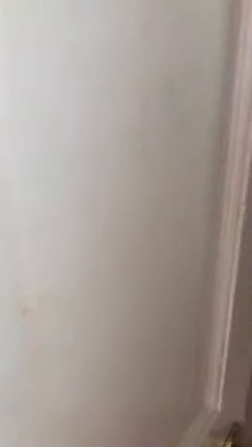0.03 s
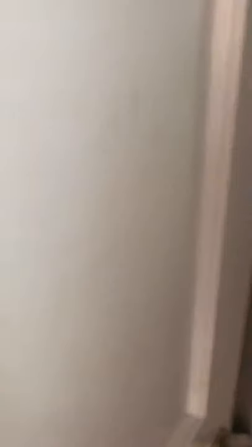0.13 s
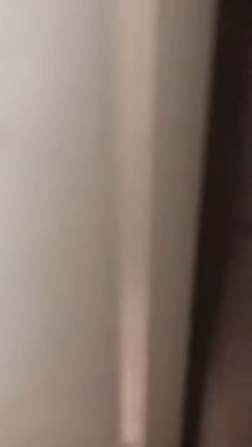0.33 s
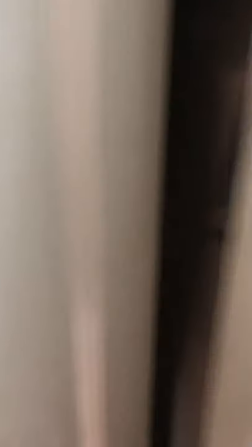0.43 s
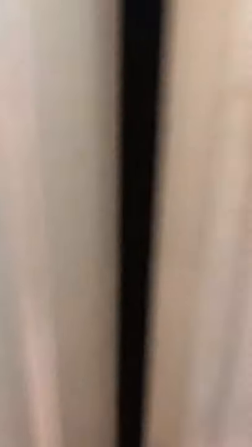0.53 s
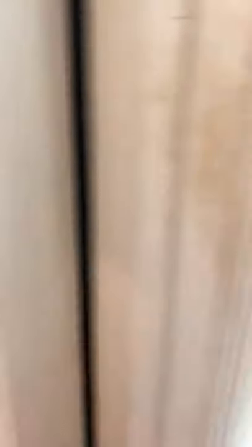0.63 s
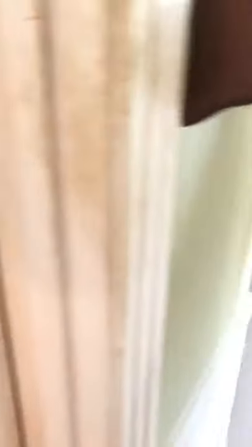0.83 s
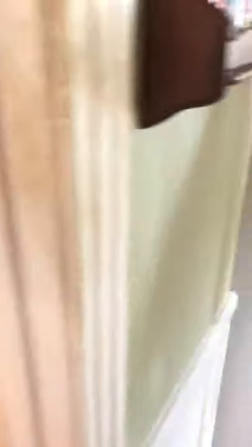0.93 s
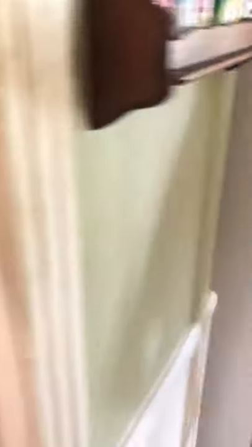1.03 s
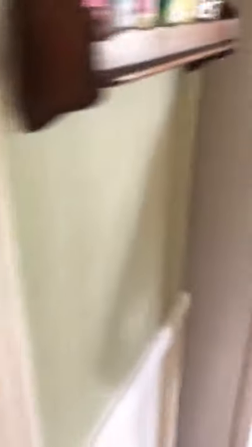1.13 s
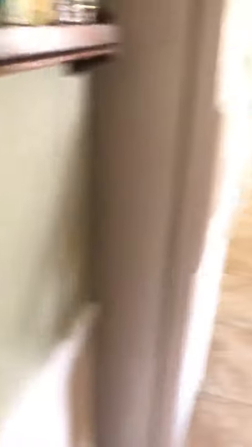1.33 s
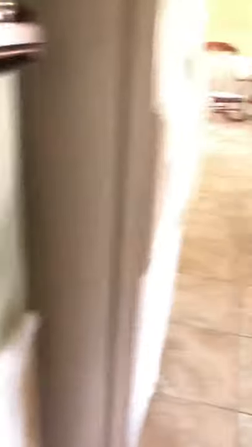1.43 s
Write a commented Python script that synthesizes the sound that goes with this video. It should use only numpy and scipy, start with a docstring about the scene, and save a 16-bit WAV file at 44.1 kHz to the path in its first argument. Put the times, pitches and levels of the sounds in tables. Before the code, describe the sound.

A door hinge squeaks indoors over a steady, quiet low hum. Faint handling rustle and ticks lead to a juddering bolt scrape at 0.2-0.3 s. From 0.37 s a thin, unsteady squeak falls in glides and steps, dropping to a short lower note near 0.8 s. At 0.87 s the latch clacks sharply with a woody boom; brushing follows around 1.15 s, with light clicks at 1.2 and 1.43 s.

```python
"""In a quiet, humming house a pantry door is worked open. The latch bolt scrapes and judders back in short slips of
filtered noise. A dry hinge sings a falling stick-slip squeak, a sum of unsteady harmonics, and drops to a lower note.
Then the latch clacks, as noise cracks with ringing metal modes, and sets the wooden panel booming in its own modes.
Something brushes along the door and the hardware ticks a few more times, as band-limited noise bursts."""
import sys
import numpy as np
from scipy import signal
from scipy.fft import rfft, irfft
from scipy.io import wavfile
from scipy.ndimage import uniform_filter1d

SR = 44100
rng = np.random.default_rng(int(sys.argv[2]) if len(sys.argv) > 2 else 0)


def pcm_store(signal):
    """Save signal as 16-bit PCM."""
    levels = np.round(np.clip(np.atleast_2d(signal), -1, 1) * 32767)
    wavfile.write(sys.argv[1], SR, levels.astype(np.int16).T)


N = 66150
T = np.arange(N) / SR  # time in seconds


def from_db(db):
    """Logarithmic level: decibels become an amplitude gain."""
    return 10 ** (np.asarray(db) / 20)


def rms_one(x):
    """Effective value: scale a signal to unit rms."""
    return x / np.sqrt(np.mean(x ** 2) + 1e-20)


def in_time(rows):
    """Linear interpolation: join the rows of a curve by straight lines, one signal per column after the time."""
    seconds, *columns = np.transpose(rows)
    return [np.interp(T, np.sort(seconds), column) for column in columns]


def during(rows):
    """Gating: one while a curve lasts, zero outside, with edges smoothed over 200 samples."""
    inside = (T > rows[0][0]) & (T < rows[-1][0])
    return uniform_filter1d(1. * inside, size=200)


def filtered(x, hz, kind, order=2):
    """Linear filtering: a Butterworth response, maximally flat in its passband."""
    edges_hz = np.clip(hz, 10, .45 * SR)
    sections = signal.butter(order, edges_hz, kind, fs=SR, output="sos")
    return signal.sosfilt(sections, x + 1e-18)


def drift(rate_hz):
    """Random modulation: low-passed noise of unit rms, taken after the filter has settled."""
    wander = filtered(rng.standard_normal(2 * N), rate_hz, "low")
    return rms_one(wander[N:])


def noise(colour):
    """Spectral shaping: white noise weighted along a curve over log frequency, at unit rms."""
    hz, db = np.transpose(colour)
    bins_hz = np.maximum(np.fft.rfftfreq(N, 1 / SR), 1)
    weight = from_db(np.interp(np.log(bins_hz), np.log(hz), db))
    return rms_one(irfft(rfft(rng.standard_normal(N)) * weight, N))


def dying(start, t60):
    """Exponential decay: instant attack, then a fall of 60 dB in t60 seconds."""
    return (T >= start) * from_db(-60 * np.maximum(T - start, 0) / t60)


def swell(start, rise_s):
    """Exponential build-up: from zero towards one with the time constant rise_s."""
    return 1 - np.exp(-np.maximum(T - start, 0) / rise_s)


def ring(start, modes, spread_db):
    """Modal superposition: decaying sines, each with a slightly different strength at every blow."""
    out, first = np.zeros(N), round(start * SR)
    for k, (hz, db, t60) in enumerate(modes):
        t = T[:min(round(2 * t60 * SR), N - first)]
        level_db = db + spread_db * rng.standard_normal() - 60 * t / t60
        sign = (-1) ** k  # neighbouring modes start in opposite directions
        out[first:first + len(t)] += sign * from_db(level_db) * np.sin(2 * np.pi * hz * t)
    return out


# Steady hum of the house. Each row: frequency in Hz, mean level in dB rms.
HUM = [(59.5, -67.5), (119.7, -63.5), (165, -62), (187.8, -54.5), (358, -69.5)]
# Spectrum of the still air. Each row: frequency in Hz, relative density in dB per Hz.
AIR_COLOUR = [(20, -15), (45, -3.5), (90, -1), (180, 3.5), (260, -3), (390, -6), (520, -12.5), (800, -14.5),
              (1500, -17.5), (3800, -29), (5800, -35.5), (8000, -31.5), (16000, -47)]
AIR_DB = -56  # rms
HUM_WAVER_DB, HUM_WAVER_HZ = 1.6, 8


def house():
    """Superposition of tones and noise: wavering hum lines lie over still air."""
    hum = 0
    for hz, db in HUM:
        strength = from_db(db + HUM_WAVER_DB * drift(HUM_WAVER_HZ))
        hum = hum + strength * np.sin(2 * np.pi * (hz * T + rng.random()))
    return np.sqrt(2) * hum + from_db(AIR_DB) * noise(AIR_COLOUR)


ROOM_EVEN_HZ = 300  # width of the spectral average


def evened(tail):
    """Spectral smoothing: level the peaks and dips of a tail, so that no single tone lingers."""
    spectrum = rfft(tail)
    size = np.abs(spectrum) + 1e-12
    smooth_size = uniform_filter1d(size, size=round(ROOM_EVEN_HZ * N / SR))
    return irfft(spectrum / size * smooth_size, N)


# Reflections from nearby walls. Each row: delay in seconds, gain as an amplitude ratio.
ECHOES = [(.0043, 0.057), (0.0107, 0.35), (0.0202, .14)]
ROOM_DB, ROOM_SPLIT_HZ = -13.5, 4700
ROOM_T60_S, ROOM_TREBLE_T60_S = 0.55, 0.14  # below and above the split


def room(x):
    """Reverberation: a few wall echoes and a diffuse tail whose treble dies first."""
    white = rng.standard_normal(N)
    low_tail = filtered(white, ROOM_SPLIT_HZ, "low") * dying(0.0013, ROOM_T60_S)
    treble_tail = filtered(white, ROOM_SPLIT_HZ, "high") * dying(0.008, ROOM_TREBLE_T60_S)
    tail = evened(low_tail - treble_tail)
    echoes = sum(gain * np.interp(T - delay, T, x, left=0) for delay, gain in ECHOES)
    diffuse = signal.fftconvolve(x, tail / np.linalg.norm(tail))[:N]
    return x + echoes + from_db(ROOM_DB) * diffuse


GRAINS_HZ = 300  # bandwidth of the catching and letting go


def rubbing(level, colour, grain_db):
    """Sliding friction: coloured noise whose strength fluctuates as the surfaces catch and let go."""
    hiss = noise(colour)
    grain = from_db(grain_db * np.minimum(drift(GRAINS_HZ), 2))
    return from_db(in_time(level)[0]) * during(level) * rms_one(hiss * grain)


# Soft rustle of handling. Each row: time in seconds, level in dB.
RUSTLE_LEVEL = [(0, -72.5), (.05, -65), (.15, -63.5), (.3, -71), (1.2, -67), (1.32, -65), (1.4, -68.5),
                (1.5, -73.5)]
# Its spectrum. Each row: frequency in Hz, relative density in dB per Hz.
RUSTLE_COLOUR = [(200, -5), (2200, -6.5), (3700, 4), (6200, 1), (8000, -11), (15000, -12)]


def rustle():
    """Weak sliding friction: handling gives a soft, lightly grained noise."""
    return rubbing(RUSTLE_LEVEL, RUSTLE_COLOUR, grain_db=1)


# Brushing along the door. Each row: time in seconds, level in dB.
BRUSH_LEVEL = [(1.05, -74), (1.08, -66), (1.11, -56), (1.145, -51.5), (1.177, -51), (1.205, -69),
               (1.28, -74)]
# Its spectrum. Each row: frequency in Hz, relative density in dB per Hz.
BRUSH_COLOUR = [(200, -21), (600, -0.5), (2500, -0.5), (5000, -1.5), (8000, -6.5), (13000, -6),
                (16000, -14)]


def brush():
    """Light sliding friction: the brushing swells and fades with little grain."""
    return rubbing(BRUSH_LEVEL, BRUSH_COLOUR, grain_db=1)


# Sliding of the bolt. Each row: time in seconds, level in dB.
SCRAPE_LEVEL = [(.2, -55.5), (.232, -54), (.265, -44), (.285, -49), (.305, -54.5), (.335, -53), (.38, -65),
                (.5, -67), (.75, -66)]
# Its spectrum. Each row: frequency in Hz, relative density in dB per Hz.
SCRAPE_COLOUR = [(100, -39), (230, -12), (310, 20.5), (450, 3.5), (700, 1), (1100, 6.5), (2200, 7.5),
                 (5000, -1), (7500, -4.5), (15000, -19)]


def scrape():
    """Rough sliding friction: the bolt makes a strongly grained noise."""
    return rubbing(SCRAPE_LEVEL, SCRAPE_COLOUR, grain_db=4.5)


# Dry knocks and ticks of knob and frame, and the narrow ring of the latch's first strike at 0.869 s. # Each
# row: start in seconds, peak level in dB, lowest and highest frequency in Hz, decay time t60 in seconds.
KNOCKS = [(.159, -46, 870, 1640, 0.13), (.199, -37, 895, 1170, 0.0085), (0.209, -51, 795, 1640, 0.037),
          (.2658, -42, 255, 1100, 0.017), (.273, -38, 288, 375, 0.049), (.869, -24.5, 1420, 1836, 0.014),
          (.935, -46, 6000, 15200, 0.011), (1.0666, -40.5, 850, 5870, 0.044), (1.196, -47, 420, 730, 0.064),
          (1.2732, -48, 537, 1430, 0.13), (1.4283, -42, 1200, 2890, 0.018)]


def knocks():
    """Damped impact: each contact is a short burst in one band."""
    out = 0
    for start, db, low_hz, high_hz, t60 in KNOCKS:
        burst = filtered(rng.standard_normal(N) * dying(start, t60), [low_hz, high_hz], "band")
        out = out + from_db(db) * burst / np.abs(burst).max()
    return out


# The bolt catches and slips on the strike plate. Each row: start in seconds, level in dB.
BOLT_SLIPS = [(0.216, -41.5), (.2298, -45), (0.2378, -37), (.246, -41), (0.2533, -40), (0.2615, -38),
              (0.2726, -40), (0.2853, -42)]
# Spectrum of the rasp of each slip. Each row: frequency in Hz, relative density in dB per Hz.
SLIP_COLOUR = [(300, -2.5), (1300, -7.5), (3700, -8), (4300, 2.5), (5600, -3.5), (6800, -17), (16000, -23)]
SLIP_T60_S = .016


def bolt():
    """Intermittent friction: the bolt judders back in a run of short, bright slips."""
    slips = sum(from_db(db) * dying(start, SLIP_T60_S) for start, db in BOLT_SLIPS)
    return noise(SLIP_COLOUR) * slips


# Blows that reach the wooden panel. Each row: start in seconds, level in dB.
THUMPS = [(0.264, -63), (0.8719, -27), (.904, -42), (1.1955, -64)]
# Modes of the panel. Each row: frequency in Hz, relative level in dB, decay time t60 in seconds.
PANEL_MODES = [(95.7, -6, 0.16), (165, -18.5, 1), (183.1, -17.5, 1.0), (214, 8, .05), (251, -16.5, 0.25),
               (331, -11, 0.2), (379.8, 1, 0.15), (397.4, -22.5, 0.47)]
# Spectrum of the dense rattle of door and frame. Each row: frequency in Hz, relative density in dB per Hz.
RATTLE_COLOUR = [(40, 5), (95, -1), (170, 5), (400, 5), (600, -10), (1000, -9.5), (2000, -25), (5000, -27),
                 (12000, -44)]
RATTLE_DB, RATTLE_T60_S, RATTLE_SWELL_S = -13, 0.54, 0.0022  # level relative to the blow
PANEL_SWELL_S, PANEL_SWELL_AT_HZ = 0.019, 101  # time constant of build-up for a mode at this frequency


def panel():
    """Modal excitation: each blow sets off a few booming modes of the wooden door and a dense rattle."""
    out, grain = 0, noise(RATTLE_COLOUR)
    for start, thump_db in THUMPS:
        boom = 0
        for hz, db, t60 in PANEL_MODES:
            rise_s = PANEL_SWELL_S * (PANEL_SWELL_AT_HZ / hz) ** 2  # lower modes build up more slowly
            boom = boom + swell(start, rise_s) * ring(start, [(hz, db, t60)], spread_db=2)
        rattle = from_db(RATTLE_DB) * swell(start, RATTLE_SWELL_S) * dying(start, RATTLE_T60_S) * grain
        out = out + from_db(thump_db) * (boom + rattle)
    return out


# Latch contacts. Each row: start in seconds, level in dB, low-pass cutoff (brightness) in Hz.
LATCH_HITS = [(.869, -27, 4400), (0.8732, -26.5, 7440), (0.8766, -31.5, 4730), (1.194, -37.5, 6160),
              (1.1962, -38, 6040), (1.2016, -41.5, 5400), (1.4262, -44.5, 3750)]
# Modes of the latch metal. Each row: frequency in Hz, relative level in dB.
LATCH_MODES = [(1515, -16), (2150, -15), (2490, -11), (2955, -15), (3170, -14), (3630, -14), (4113, -10)]
# Spectrum of the crack of a contact. Each row: frequency in Hz, relative density in dB per Hz.
CRACK_COLOUR = [(500, -8.5), (1500, 0), (4200, 0.5), (4900, -6), (5900, 0.5), (6800, -14.5), (16000, -17)]
LATCH_T60_S, CRACK_T60_S = .035, .017
CRACK_DB = -1.5  # relative to the contact


def latch():
    """Impact of metal parts: each contact is a dry broad crack with a brief modal ring."""
    out, modes = 0, [(hz, db, LATCH_T60_S) for hz, db in LATCH_MODES]
    for start, db, bright_hz in LATCH_HITS:
        crack = from_db(CRACK_DB) * dying(start, CRACK_T60_S) * noise(CRACK_COLOUR)
        metal = .5 * ring(start, modes, spread_db=2.5)
        out = out + from_db(db) * filtered(crack + metal, bright_hz, "low")
    return out


# A rough whine under the squeak's start and a faint 2.2 kHz room resonance lingering at its end, one curve each.
# Each row of a curve: time in seconds, centre frequency in Hz, level in dB rms.
ROUGH_TONES = [
    [(.36, 1750, -78), (.378, 1800, -55), (.42, 1820, -64), (.48, 1907, -60), (.53, 1970, -76)],
    [(.745, 2230, -70), (.778, 2230, -55.5), (.82, 2290, -70)],
]
ROUGH_WIDTH_HZ = 92  # bandwidth of the modulating noise


def rough_tones():
    """Narrow-band noise: two random amplitudes in quadrature roughen each slowly rising tone."""
    out = 0
    for curve in ROUGH_TONES:
        hz, db = in_time(curve)
        phase = 2 * np.pi * np.cumsum(hz) / SR
        tone = drift(ROUGH_WIDTH_HZ) * np.sin(phase) + drift(ROUGH_WIDTH_HZ) * np.cos(phase)
        out = out + from_db(db) * during(curve) * tone
    return out


# Upper overtones of the squeak. Each row: multiple of the slip rate, level in dB relative to the upper level.
OVERTONES = [(3, 0.5), (4, -11)]
JITTER, JITTER_HZ = 0.00315, 150  # rms fraction of the slip rate, bandwidth
SHIMMER_DB, SHIMMER_HZ = 1.6, 120  # rms flutter of each partial, bandwidth


def stick_slip(hz, fundamental_db, octave_db, upper_db):
    """Stick-slip oscillation: nearly periodic slips give harmonics, each of which flutters on its own."""
    unsteady_hz = hz * (1 + JITTER * drift(JITTER_HZ))
    phase = 2 * np.pi * np.cumsum(unsteady_hz) / SR
    partials = [(1, fundamental_db), (2, octave_db)]
    partials += [(round(multiple), upper_db + db) for multiple, db in OVERTONES]
    out = 0
    for multiple, db in partials:
        out = out + from_db(db + SHIMMER_DB * drift(SHIMMER_HZ)) * np.sin(multiple * phase)
    return np.sqrt(2) * out  # a sine of unit rms peaks at the root of two


# Slip rate of the hinge, falling in glides and sudden steps. Each row: time in seconds, rate in Hz.
HINGE_PITCH = [(.375, 3610), (.411, 3512), (.427, 3404), (.462, 3285), (.469, 2962), (.51, 2825),
               (.563, 2695), (.569, 2623), (.642, 2518), (.651, 2358), (.689, 2270), (.77, 2010)]
# The long squeak flutters in loudness, and its overtones flare up after some of the pitch steps.
# Each row: time in seconds, levels of the fundamental, the octave and the upper overtones in dB.
HINGE_LEVEL = [(.372, -69, -90, -95), (.392, -46, -72, -92), (.413, -55.5, -77, -74),
               (.438, -39, -57.5, -73), (.458, -54, -64, -79), (.47, -47, -58.5, -84),
               (.493, -55.5, -52, -70), (.505, -41, -70, -76), (.53, -41.5, -57.5, -78),
               (.565, -38, -55, -81), (.575, -43.5, -63, -57), (.596, -41.5, -52, -68),
               (.61, -37, -55.5, -63.5), (.643, -41.5, -62, -80), (.653, -46.5, -44.5, -56.5),
               (.678, -54, -52, -63), (.69, -42, -65, -60), (.704, -49, -59, -96), (.72, -44.5, -56, -71),
               (.75, -57.5, -80, -88), (.77, -78, -88, -99)]
# The lower note as the door slows.
# Each row: time in seconds, rate in Hz, levels of the fundamental, the octave and the upper overtones in dB.
LOW_SQUEAK = [(.772, 1612, -54.5, -75, -80), (.79, 1505, -60, -77, -89), (.803, 1328, -48, -51.5, -68),
              (.825, 1303, -47.5, -72, -86), (.855, 1255, -75, -80, -91)]
HINGE_TOP_HZ = 9600


def hinge():
    """Stick-slip friction at a varying slip rate: the long falling squeak, then the short low one."""
    high = stick_slip(*in_time(HINGE_PITCH), *in_time(HINGE_LEVEL)) * during(HINGE_LEVEL)
    low = stick_slip(*in_time(LOW_SQUEAK)) * during(LOW_SQUEAK)
    return filtered(high + low, HINGE_TOP_HZ, "low")


def scene():
    """Superposition: the door hardware sounds in its room; panel and house are added without reverberation."""
    friction = scrape() + brush() + rustle()
    hardware = hinge() + rough_tones() + bolt() + latch() + knocks()
    return (room(hardware + friction) + panel() + house())[None]


LOW_CUT_HZ, CUTOFF_HZ = 38, 16000


def record(dry):
    """Band limiting: the microphone drops the deepest bass and an elliptic filter cuts the top steeply."""
    dry = filtered(dry, LOW_CUT_HZ, "high", order=3)
    # order 12, 0.1 dB passband ripple, 70 dB stopband attenuation
    steep = signal.ellip(12, .1, 70, CUTOFF_HZ, fs=SR, output="sos")
    return signal.sosfilt(steep, dry)


dry = scene()
out = record(dry)
pcm_store(out)
```